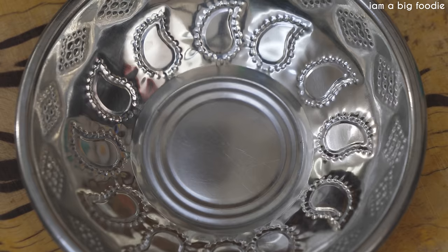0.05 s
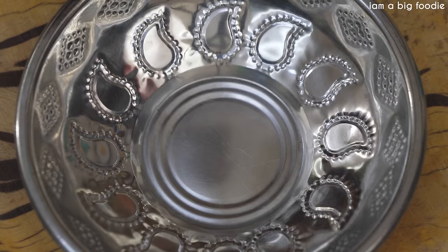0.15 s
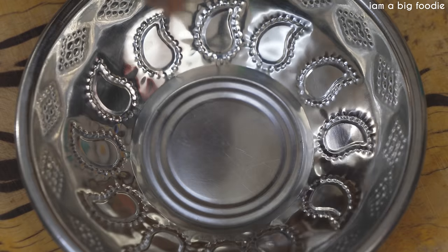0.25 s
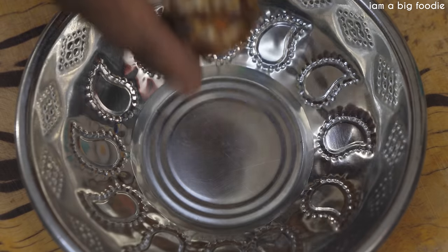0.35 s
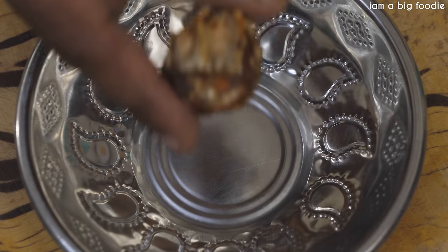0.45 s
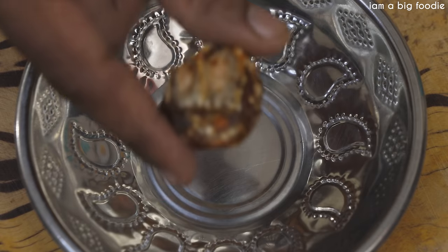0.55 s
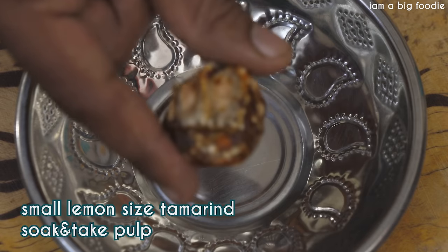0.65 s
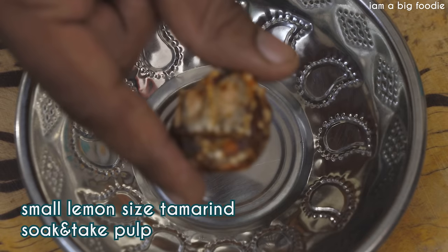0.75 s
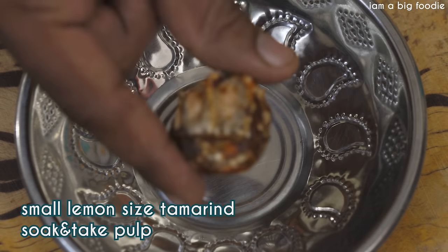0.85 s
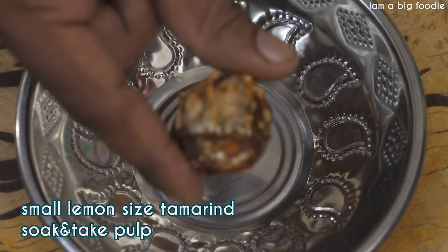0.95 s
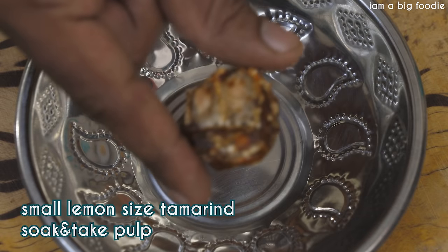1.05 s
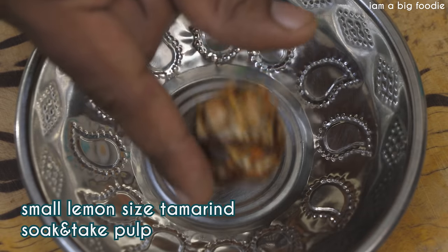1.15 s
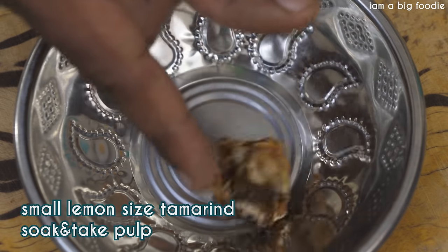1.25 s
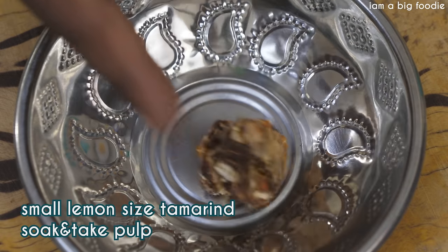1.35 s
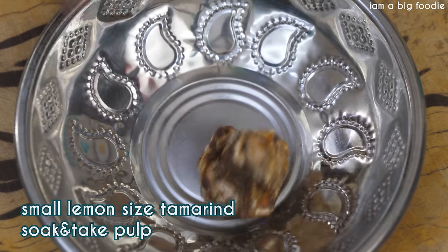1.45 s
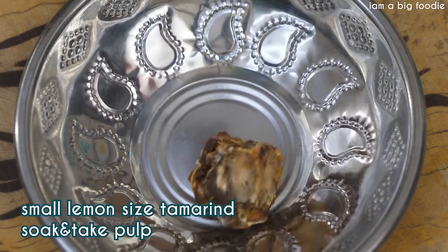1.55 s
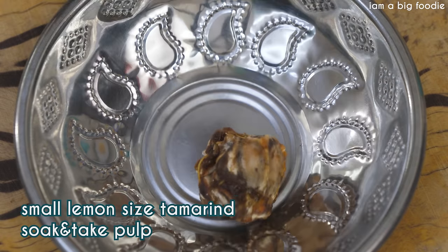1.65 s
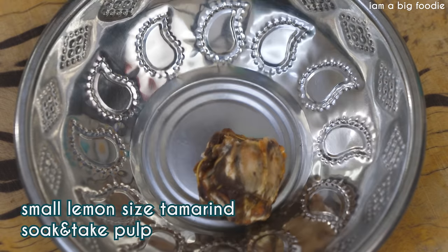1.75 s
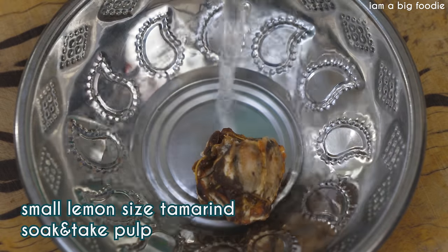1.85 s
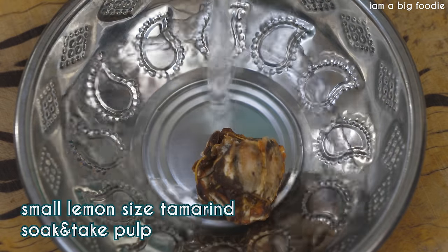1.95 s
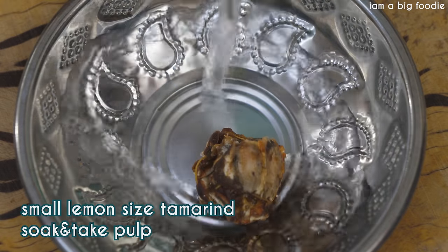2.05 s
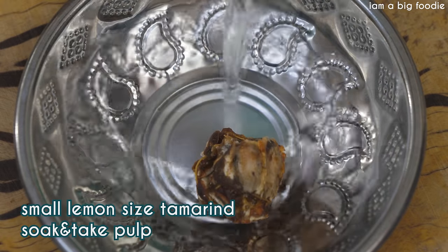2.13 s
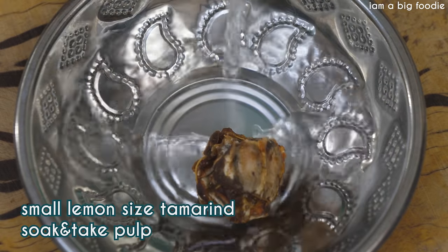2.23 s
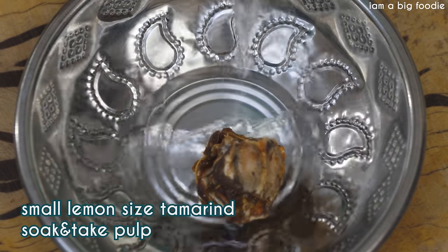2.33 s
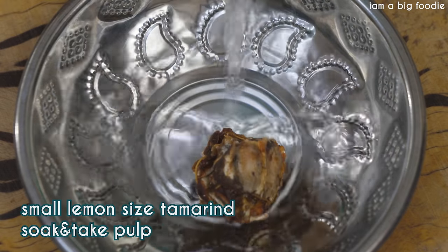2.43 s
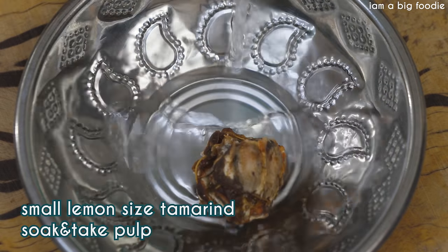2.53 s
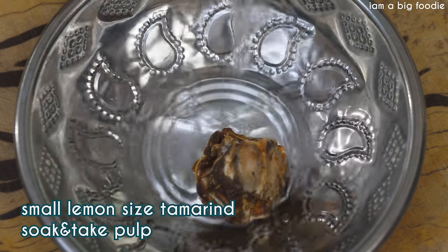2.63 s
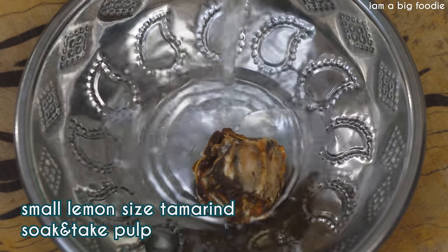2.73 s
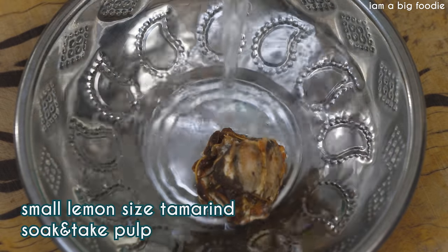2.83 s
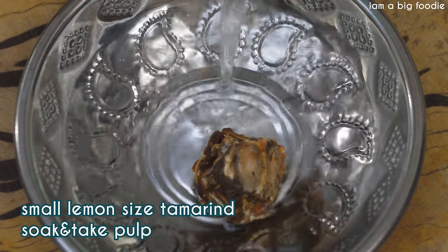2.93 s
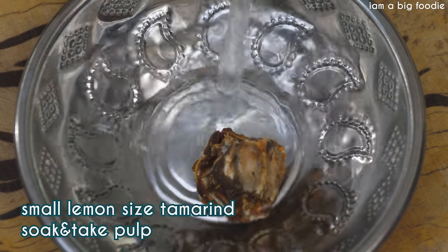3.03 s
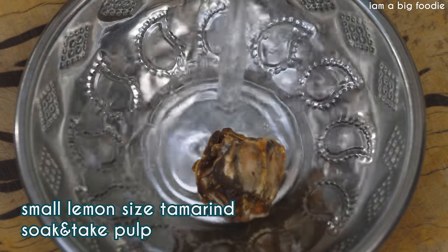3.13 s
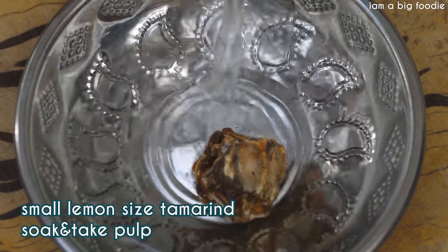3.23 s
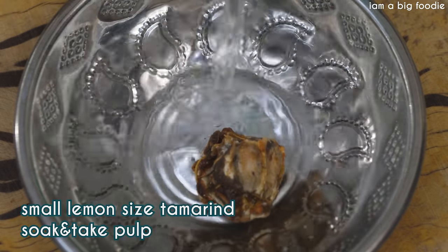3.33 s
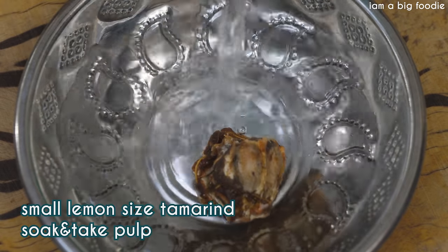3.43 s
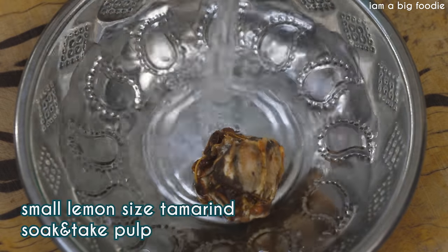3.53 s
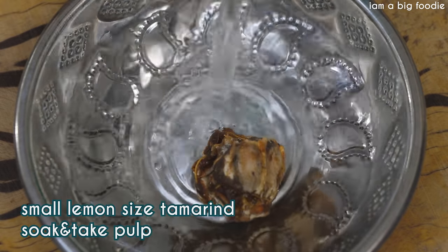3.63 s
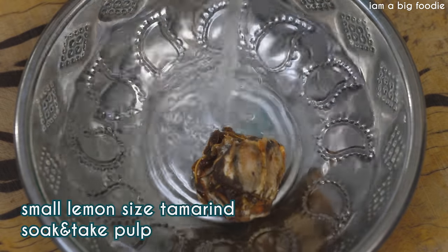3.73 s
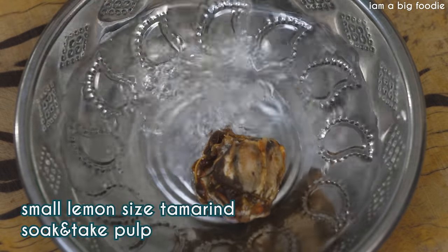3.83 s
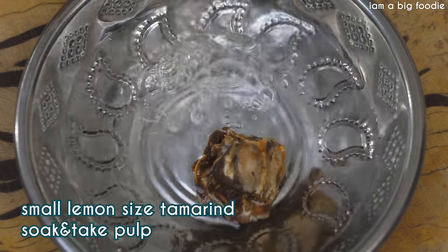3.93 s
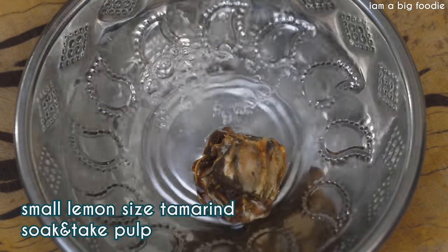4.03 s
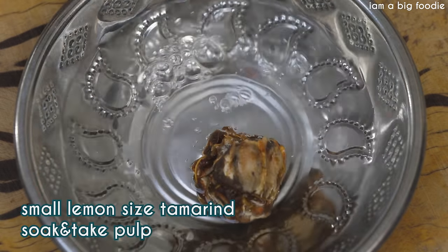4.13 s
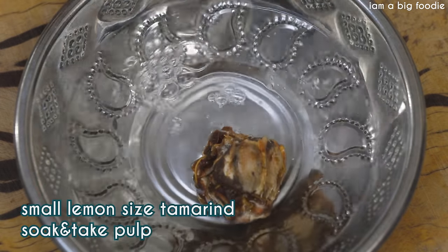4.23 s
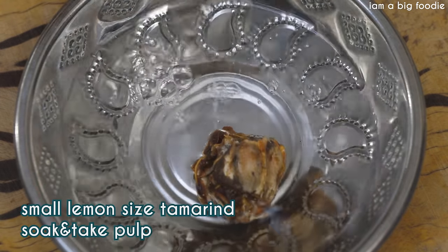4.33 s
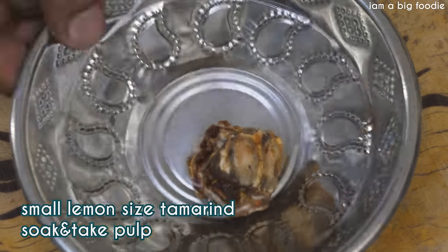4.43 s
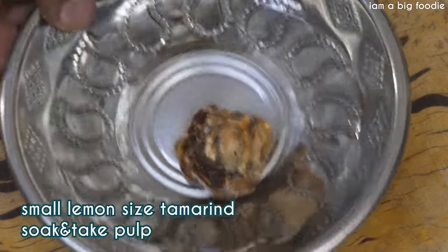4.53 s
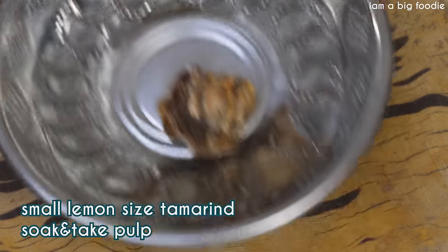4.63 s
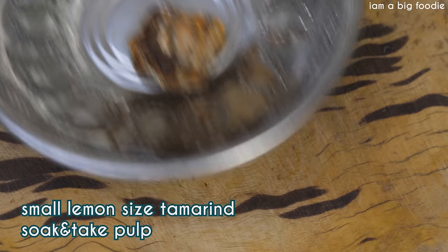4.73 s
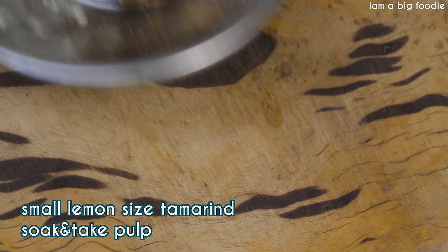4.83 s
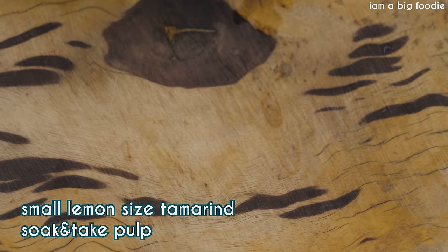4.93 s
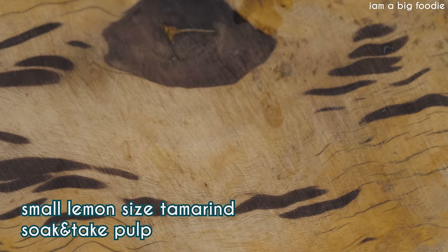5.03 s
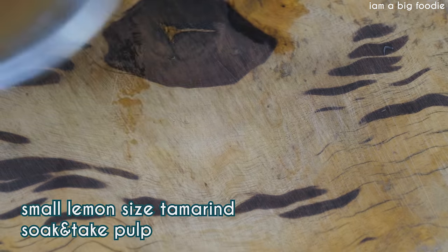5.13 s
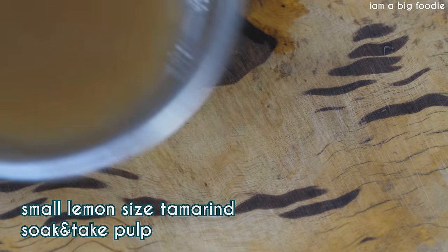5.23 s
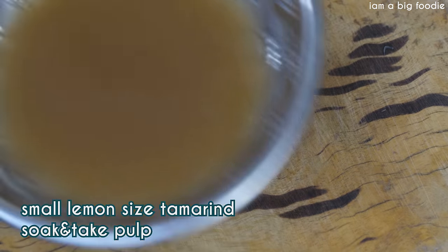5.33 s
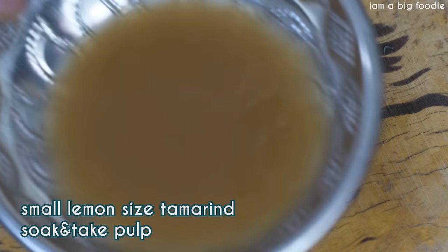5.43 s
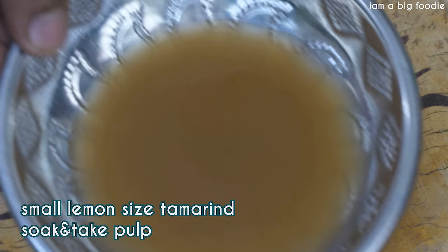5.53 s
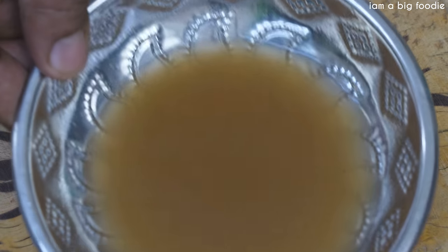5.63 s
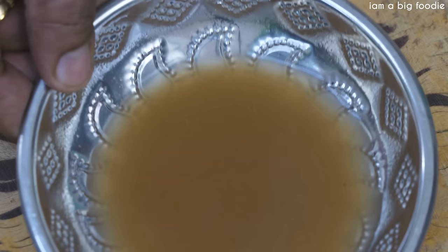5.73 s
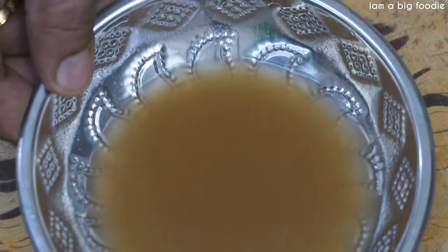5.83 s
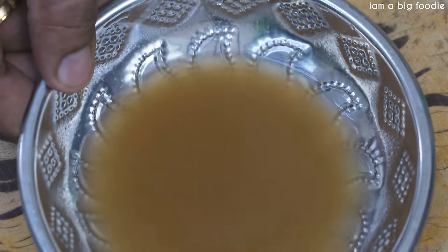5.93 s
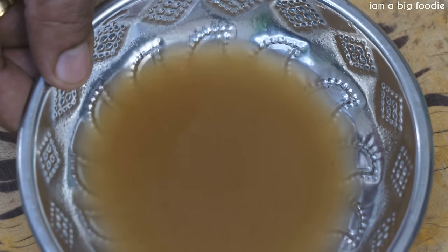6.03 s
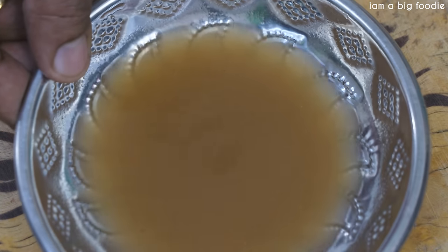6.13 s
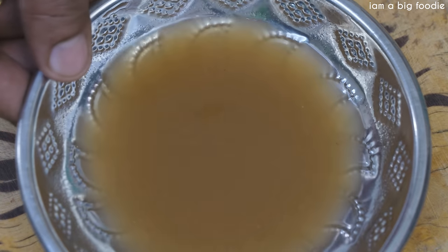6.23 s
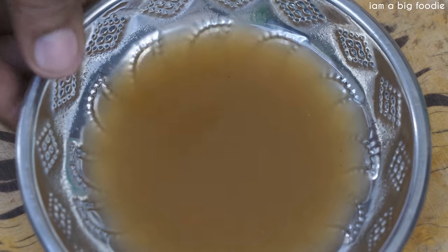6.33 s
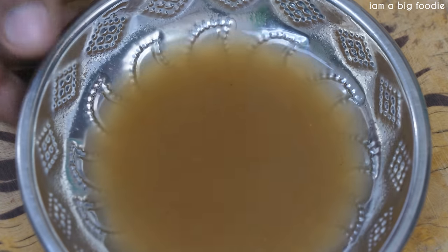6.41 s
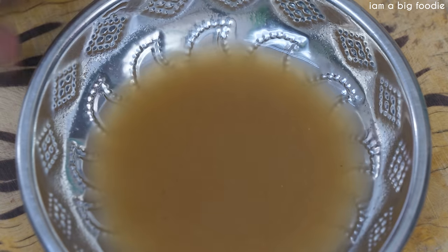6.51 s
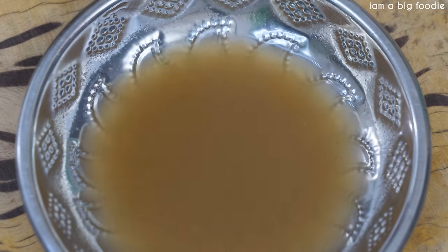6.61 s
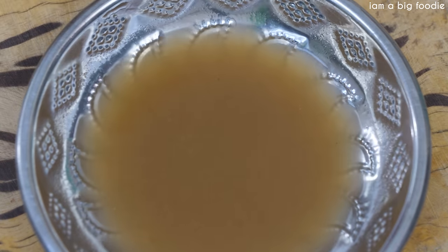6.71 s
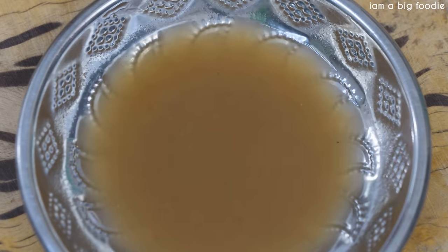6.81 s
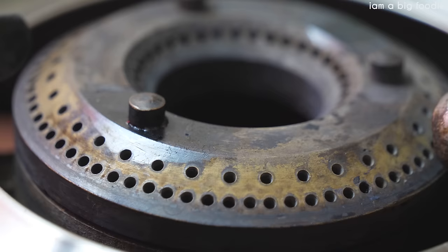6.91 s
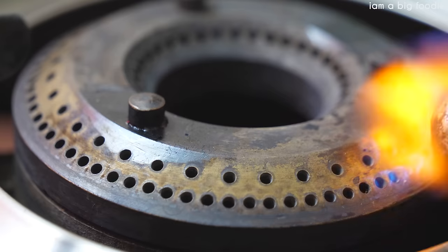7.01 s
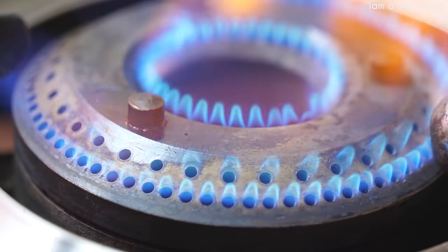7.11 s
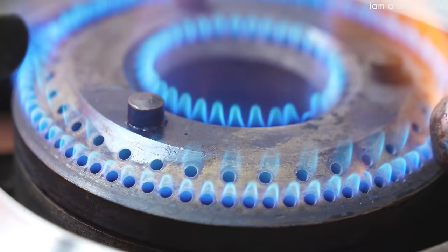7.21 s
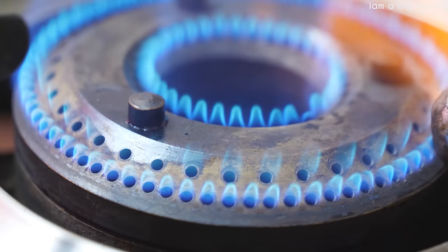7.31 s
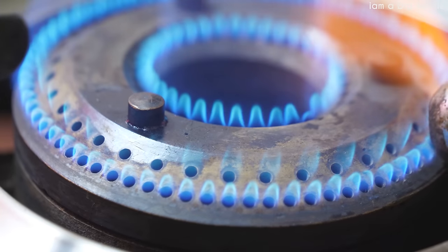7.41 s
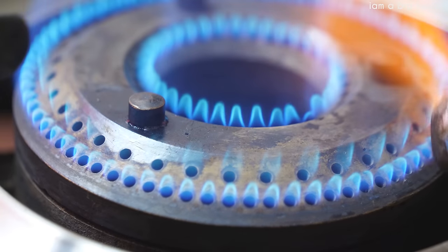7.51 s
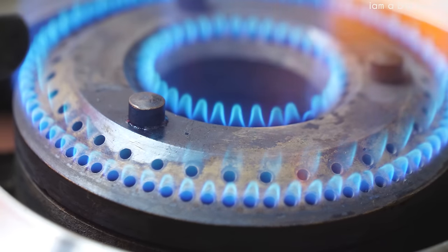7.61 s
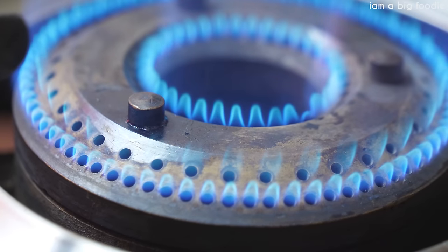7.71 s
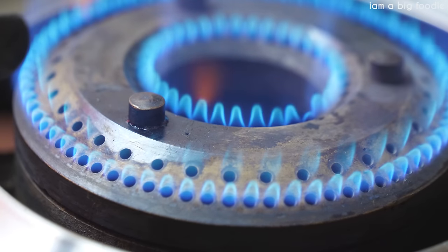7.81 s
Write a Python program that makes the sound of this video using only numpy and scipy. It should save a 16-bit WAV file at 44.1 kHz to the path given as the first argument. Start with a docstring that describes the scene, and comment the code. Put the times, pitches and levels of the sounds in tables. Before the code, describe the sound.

In a humming kitchen a sticky lump clanks into a thin steel bowl, water pours over it, the bowl clatters on wood, a gas burner ignites.

```python
"""A motor hums in a small kitchen throughout: wavering sine lines over a rush of air. One lone tick, a soft rustle,
then a sticky lump drops into a thin steel bowl: noise bursts and decaying modes. Water is poured over it:
chirping bubbles, sprays and a sheet of noise through the wet bowl's resonances, then foam ticks.
The bowl clatters onto a wooden board. A gas stove is lit: hiss, igniter snap, a low whump of flame
(sinking tone and noise); the knob springs back."""
import sys
import numpy as np
from scipy import signal
from scipy.fft import rfft, irfft
from scipy.io import wavfile

SR = 44100
rng = np.random.default_rng(int(sys.argv[2]) if len(sys.argv) > 2 else 0)


def digitize_waveform(pressure):
    """Quantize a signal to 16-bit integers and store it at the path in sys.argv[1].

    Rows of a 2-D input are taken as channels; values are limited to [-1, 1].
    """
    field = np.atleast_2d(pressure).T
    bounded = np.clip(field, -1, 1)
    quanta = np.round(bounded * 32767).astype(np.int16)
    wavfile.write(sys.argv[1], SR, quanta)


N = 346746
T = np.arange(N) / SR
RING_T = T[:SR]
TOP_HZ = 15900

# All levels are relative; the functions add their own gains.
# kitchen motor lines: pitch_hz, level_db
HUM_LINES = [(128, -66.5), (180, -60.5), (192.5, -62), (301, -68.5), (640, -77.5)]
# kitchen air spectrum: freq_hz, level_db
AIR_SPECTRUM = [(18, -78.5), (30, -50.5), (48, -22), (98, -19), (117, -15.5), (152, -10.5), (183, -7),
                (271, -12.5), (309, -10.5), (343, -12.5), (714, -16), (1270, -23.5), (1530, -23.5),
                (2380, -27), (15700, -38)]

# bubbles ringing alone: ticks, low gulps, one long whistle: start_s, level_db, pitch_hz, length_cycles
LONE_BUBBLES = [(0.128, -35.5, 4360, 36), (2.197, -47.5, 5040, 1800), (3.7745, -19.5, 3180, 30),
                (3.938, -16.5, 910, 11), (3.972, -27.5, 790, 15), (4.1237, -13, 12600, 7.4),
                (4.147, -27, 9300, 23)]

# soft rustle as the hand brings the lump in
RUSTLE_PEAK_S, RUSTLE_DB, RUSTLE_SLOPE_DB_PER_S = 0.662, -48.5, 209
# rustle spectrum: freq_hz, level_db
RUSTLE_SPECTRUM = [(300, -2), (1500, -3), (4500, -1), (9000, -7), (15700, -8.5)]

# lump meets the bowl, then rolls to rest: start_s, crash_db, ring_db
LUMP_HITS = [(1.3127, -13.5, -31.5), (1.315, -16, -33), (1.3245, -27, -57), (1.395, -48, -69),
             (1.445, -40, -45), (1.619, -49, -58), (1.726, -53.5, -79), (1.802, -59, -64)]
# empty bowl modes: pitch_hz, level_db, t60_s
EMPTY_BOWL_MODES = [(1710, -34, 0.58), (1987, -2.5, 0.28), (2084, 1.5, 0.33), (2150, -23.5, 0.83),
                    (2360, -29, 0.54), (2570, -22, 0.61), (2560, -12.5, 0.068), (2640, -41, 0.46),
                    (3090, -45.5, 0.27), (3167, -8.5, 0.47), (3540, -19.5, 0.44), (3300, -23, 0.25),
                    (3528, -6, 0.31), (3920, -31, 0.88), (4230, -20.5, 0.29), (4813, -30.5, 0.44),
                    (5071, -39, 0.41), (6360, -35.5, 0.34), (6730, -33.5, 0.307), (7752, -39.5, 0.32),
                    (8160, -12, 0.3), (9360, -41.5, 0.3), (10420, -51.5, 0.75), (11440, -21, 0.2)]
# blow on the empty bowl, spectrum: freq_hz, level_db
BOWL_BLOW_SPECTRUM = [(88, -63.5), (150, -30.5), (239, -17.5), (621, -22), (1460, -17), (2080, -4),
                      (2470, -6), (3060, -4.5), (5600, -14.5), (7800, -17.5), (8430, -27), (9660, -20.5),
                      (15700, -35.5)]
# dense after-ring of the empty bowl, spectrum: freq_hz, level_db
BOWL_RING_SPECTRUM = [(410, -42), (700, -16.5), (1010, -15.5), (1590, -9), (1910, -13), (2060, -1.5),
                      (2570, -8), (3900, 1.5), (5550, -20.5), (15700, -37)]

# flow: smooth thread, breaking up as the bowl fills, then cut off: time_s, gurgle_db, spatter_db
POUR_FLOW = [(1.85, -59, -76), (1.92, -55.5, -73.5), (2.62, -55, -56.5), (2.79, -46.5, -50),
             (3.14, -44, -45), (3.25, -48.5, -52.5), (3.33, -42, -50), (3.56, -39, -50), (3.79, -45.5, -53),
             (3.99, -40, -58), (4.05, -54, -70)]
POUR_START_S, POUR_END_S = POUR_FLOW[0][0], POUR_FLOW[-1][0]
# single drops and gulps, loud and faint, during and just after the pour:
# start_s, level_db, bubble_pitch_hz, spray_db
DROPS = [(1.905, -33, 3530, -48), (1.923, -38, 3640, -43.5), (2.1405, -34.5, 3400, -49.5),
         (2.177, -31, 3440, -41.5), (2.3024, -37, 3220, -37), (2.3111, -32, 3560, -32.5),
         (2.3326, -22.5, 3430, -30.5), (2.4349, -25, 2050, -40), (2.4793, -27.5, 3050, -42.5),
         (2.5282, -30, 3480, -34), (2.6234, -22, 3560, -68), (2.7227, -34, 3550, -32.5),
         (2.7676, -24, 2070, -55), (2.8275, -15.5, 3230, -58), (2.8963, -29, 2200, -31.5),
         (3.0185, -26, 3500, -38.5), (3.1263, -22, 1780, -49), (3.1464, -24, 2040, -36.5),
         (3.4111, -23.5, 3750, -58), (3.4316, -18, 2390, -62), (3.46, -17, 3780, -59),
         (3.4724, -19, 2430, -58), (3.7014, -22, 2330, -49), (3.8097, -20.5, 2420, -30),
         (3.8397, -17, 1710, -31.5), (3.8756, -15.5, 3020, -44), (3.896, -19, 3500, -24),
         (3.911, -11.5, 3200, -29.5), (3.9709, -21, 1720, -33.5), (3.9993, -25.5, 2050, -42),
         (4.4314, -44, 1640, -59), (4.4982, -27.5, 2120, -55)]
# slap of a drop on steel, spectrum: freq_hz, level_db
SLAP_SPECTRUM = [(700, -10), (1300, 8.5), (2100, 16), (3600, 14), (4800, -7.5), (7300, -21), (15000, -73)]
# running sheet of water, spectrum: freq_hz, level_db
SHEET_SPECTRUM = [(700, -52), (1200, -1.0), (1500, 0.5), (2150, 4), (2800, -2.5), (3600, 6),
                  (4800, -4.0), (12000, -34)]
# swilling water, spectrum: freq_hz, level_db
SWILL_SPECTRUM = [(60, -27), (200, -9.5), (380, 0.5), (850, -4.0), (1500, -9.5), (4200, -8),
                  (6000, -34), (15000, -23)]
# wet bowl resonances: centre_hz, width_hz, level_db
WET_BOWL_RESONANCES = [(1470, 60, -5), (2160, 1200, 4.5), (3870, 710, 6.5), (6650, 650, 4.5)]
SPRAY_HZ, MIST_HZ, MIST_DB = 6670, 11900, -4.5  # every drop throws a coarse spray and a finer, weaker mist
# further random drops once the stream breaks up; level follows the flow
DRIP_START_S, DRIP_END_S, DRIP_HZ, DRIP_OCTAVES = 2, 3.8, 2530, 1.14
DRIP_OVER_GURGLE_DB, DRIP_OVER_SPATTER_DB, DRIP_RANGE_DB = 15, -1, 8
# water swills round the bowl as the pour ends
SWILL_PEAK_S, SWILL_DB, SWILL_RISE_DB_PER_S, SWILL_FALL_DB_PER_S = 3.88, -55, 69, 14.5
# foam bursts
FOAM_START_S, FOAM_LENGTH_S, FOAM_HZ, FOAM_OCTAVES = 4.03, .5, 8700, 1.4
FOAM_DB, FOAM_RANGE_DB, FOAM_FADE_DB_PER_S = -37, 18, 12

# filled bowl meets the board: start_s, knock_db, wall_ring_db, rim_scrape_db
BOARD_HITS = [(5.8622, -20.5, -22.5, -59), (5.874, -42, -18.5, -64), (5.938, -21, -26, -45),
              (5.96, -51, -24, -67), (6.107, -33, -33.5, -27.5), (6.189, -42.5, -69, -47),
              (6.306, -58, -46, -73), (6.365, -56, -63, -76)]
# filled bowl wall modes: pitch_hz, level_db, t60_s
FULL_BOWL_MODES = [(684, -19.5, 0.31), (1122, -2, 0.091), (1165, 2, 0.1), (1264, -2.5, 0.15),
                   (1386, 4.5, 0.086), (1910, -7, 0.16), (1980, -21, 0.28), (2330, -0.5, 0.061),
                   (2394, -26, 0.13), (2520, -8.5, 0.16), (2540, -32, 0.19), (3360, -15, 0.19),
                   (3820, -12, 0.13), (4330, -21, 0.37)]
# knock of the filled bowl's base, spectrum: freq_hz, level_db
FULL_BLOW_SPECTRUM = [(150, -61), (250, -27), (406, -11.5), (458, -15.5), (660, -9.5), (732, -16),
                      (1250, 1), (1540, -6), (2000, -1.5), (2550, -2), (2980, -15.5), (4210, -12),
                      (5850, -28.5), (7590, -25), (15700, -70)]
# bowl rim, spectrum: freq_hz, level_db
RIM_SPECTRUM = [(590, -31), (1000, -31), (1380, -26), (1500, -26), (2070, 3), (2320, -36), (2570, 2.5),
                (2990, -16), (3850, -9), (10900, -19), (15700, -27)]

GAS_ON_S, GAS_OPENING_S, GAS_DB = 6.96, 0.028, -43  # valve opens on a steady hiss
# gas hiss spectrum: freq_hz, level_db
GAS_SPECTRUM = [(35, -29), (60, -18), (156, 4.5), (336, -27), (835, -18.5), (1010, -19), (2070, -24.5),
                (2500, -26), (6960, -32.5), (10800, -31), (15700, -36.5)]
# gas catches in quick flares: peak_s, level_db
FLARE_PEAKS = [(7.137, -11), (7.22, -15), (7.295, -15.5)]
FLARE_RISE_DB_PER_S, FLARE_FALL_DB_PER_S = 600, 290
WHUMP_START_HZ, WHUMP_END_HZ, WHUMP_SAG_S = 171.7, 105.3, 0.0592  # pitch sinks as the flame spreads
# noise part of the whump, spectrum: freq_hz, level_db
WHUMP_SPECTRUM = [(40, -54.0), (85, -7), (190, 3), (320, -13.0), (1500, -62)]
# flame roars up once, then settles to a steady flutter
ROAR_PEAK_S, ROAR_DB, ROAR_RISE_DB_PER_S, ROAR_FALL_DB_PER_S, FLAME_DB = 7.32, -25, 160, 134, -45
# flame spectrum: freq_hz, level_db
FLAME_SPECTRUM = [(35, -63), (60, -19), (155, 1.5), (255, -18), (407, -9.5), (526, -7.5), (710, -11.5),
                  (946, -16.5), (2200, -26), (2860, -57), (4840, -120)]

# igniter hammer trips, strikes, bounces: start_s, level_db
IGNITER_HITS = [(7.1158, -9), (7.1172, 4), (7.126, -8)]
# igniter snap spectrum: freq_hz, level_db
SNAP_SPECTRUM = [(47, -24), (80, -12), (177, -7), (667, -11.5), (814, -5.5), (1160, -10.5), (2200, -12),
                 (2680, -16), (3820, -1.5), (4360, -3), (5820, -15.5), (7750, -7.5), (10100, -15.5),
                 (13800, -14), (15700, -30)]
# sheet-metal stove body, ring spectrum: freq_hz, level_db
STOVE_RING_SPECTRUM = [(150, -30), (250, -11), (308, -7.5), (574, -2.5), (1090, -8.5), (1340, -11),
                       (2420, -15), (3930, 0.5), (5460, -15.5), (8870, -15), (9850, -19), (14900, -31),
                       (15700, -26)]
# knob knocks in the stove's front: start_s, thud_db, click_db, spring_ring_db
KNOB_HITS = [(7.08, -38, -75, -69), (7.3552, -27, -21.5, -60), (7.413, -25, -53, -57),
             (7.58, -33, -52, -61), (7.592, -31, -45, -65), (7.6299, -15.5, -18, -13)]
# knob thud spectrum: freq_hz, level_db
KNOB_THUD_SPECTRUM = [(88, -34), (150, -16), (364, -0.5), (757, 3), (1020, -5), (1250, -11.5), (1520, -5.5),
                      (1700, -14.5), (1990, -12.5), (2200, -20), (2860, -33), (4840, -120)]
# knob click spectrum: freq_hz, level_db
KNOB_CLICK_SPECTRUM = [(1290, -50), (2200, -12), (2330, -13), (2770, -11), (3400, -8.5), (3910, -8),
                       (4540, -11), (5130, -17), (5910, -19.5), (7080, -26), (7750, -19.5), (10300, -23),
                       (15700, -44)]
# knob spring modes, before a shared extra decay: pitch_hz, level_db, t60_s
KNOB_SPRING_MODES = [(432, -33, 0.21), (692, -5, 0.84), (2517, -6.5, 0.63), (2770, -12, 0.54),
                     (2806, 1, 0.47), (3980, -3.5, 0.56), (3830, 3.5, 0.25), (5140, 0.5, 0.15),
                     (7180, -3.5, 0.22), (9286, -22, .4)]


def undb(db):
    """Decibels to gain."""
    return 10 ** (np.asarray(db) / 20)


def unit(x):
    """Scale to rms 1."""
    return x / np.sqrt(np.mean(x ** 2) + 1e-20)


def curves(rows):
    """Each column of a table, joined by straight lines in time."""
    time_s, *columns = np.transpose(rows)
    return [np.interp(T, time_s, column) for column in columns]


def add(out, start_s, x):
    """Mix x into out from start_s."""
    i = int(np.clip(start_s * SR, 0, N - 1))
    out[i:i + len(x)] += x[:N - i]


def fade(t60, t=RING_T):
    """Exponential decay of 60 dB in t60."""
    return np.exp(-np.log(1000) * t / max(t60, 1e-4))


def swell(peak_s, rise_db_per_s, fall_db_per_s):
    """A gain that climbs to 1 at peak_s and dies away, both at a steady rate in dB."""
    return undb(-np.maximum(rise_db_per_s * (peak_s - T), fall_db_per_s * (T - peak_s)))


def walk(rate_hz):
    """Random wander: normal points at rate_hz, joined by lines."""
    points = rng.standard_normal(2048)
    return np.interp(T * rate_hz, np.arange(len(points)), points)


def colour(x, spectrum):
    """Pass x through a causal minimum-phase filter shaped by (freq_hz, level_db) points; rms 1."""
    hz, db = np.transpose(spectrum)
    size = 4096
    f = np.maximum(np.fft.rfftfreq(size, 1 / SR), 1)
    gain = undb(np.interp(np.log(f), np.log(hz), db))
    cepstrum = irfft(np.log(gain))
    # keeping one side of the cepstrum makes the response causal
    response = irfft(np.exp(rfft(2 * cepstrum[:size // 2], size)))
    return unit(signal.fftconvolve(x, response)[:len(x)])


def noise(spectrum, size=SR):
    """Coloured noise at rms 1."""
    return colour(rng.standard_normal(size), spectrum)


def burst(spectrum, t60, size=SR):
    """A crowd of modes too dense to tell apart: decaying noise that starts at rms near 1."""
    envelope = fade(t60, RING_T[:size])
    crowd = colour(rng.standard_normal(size) * envelope, spectrum)
    return crowd * np.sqrt(np.mean(envelope ** 2))


def ring(modes):
    """Struck modes, each a decaying sine at its own phase; 1 ms onset, rms near 1 at the start."""
    waves = np.zeros(SR)
    for hz, db, t60 in modes:
        waves += undb(db) * fade(t60) * np.sin(2 * np.pi * (hz * RING_T + rng.random()))
    contact = np.minimum(RING_T / .001, 1)
    return contact * waves / np.sqrt(sum(undb(db) ** 2 for _, db, _ in modes) / 2)


def echo(x, response):
    """Pass x through a response of unit energy."""
    return signal.fftconvolve(x, response / np.linalg.norm(response))[:N]


def bubble(hz, cycles, glide):
    """A pocket of air rings for some cycles, rising in pitch as it nears the surface."""
    age = np.arange(int(cycles * SR / hz) + 2) / SR * hz / cycles  # 0 to 1 over its life
    onset = 1 - np.exp(-age * cycles)
    return onset * fade(0.85, age) * np.sin(2 * np.pi * cycles * (age + glide * age ** 2 / 2))


def spray(hz, t60, octaves, size=4096):
    """A puff of droplets of like size: a brief hiss around one pitch."""
    t = RING_T[:size]
    f = np.maximum(np.fft.rfftfreq(size, 1 / SR), 1)
    band_gain = 1 / (1 + (np.log2(f / hz) / octaves) ** 2)
    band = irfft(rfft(rng.standard_normal(size)) * band_gain)
    onset = 1 - np.exp(-t / 0.0013)
    return unit(band) * onset * fade(t60, t)


def kitchen():
    """A motor's wavering sine lines over a soft rush of air."""
    hum = np.zeros(N)
    for hz, db in HUM_LINES:
        level = undb(db + 1.6 * walk(6))
        phase = 2 * np.pi * np.cumsum(hz + 1.8 * walk(12)) / SR
        hum += level * np.sqrt(2) * np.sin(phase)
    draught = undb(.6 * walk(3))
    air = undb(-57.0) * draught * noise(AIR_SPECTRUM, size=N)
    return (hum + air) * np.clip((T - .04) / 0.015, 0, 1)


def ticks():
    """Lone bubbles: most are ticks some tens of cycles long or less."""
    out = np.zeros(N)
    for start_s, db, hz, cycles in LONE_BUBBLES:
        add(out, start_s, undb(db) * bubble(hz, cycles, glide=0.0092))
    return out


def rustle():
    """A brief, soft brush of noise before the lump drops."""
    level = undb(RUSTLE_DB) * swell(RUSTLE_PEAK_S, RUSTLE_SLOPE_DB_PER_S, RUSTLE_SLOPE_DB_PER_S)
    return level * noise(RUSTLE_SPECTRUM, size=N)


def lump():
    """The lump strikes the dry bowl: a short crash, then dense and single modes ring on."""
    out = np.zeros(N)
    walls = ring(EMPTY_BOWL_MODES)
    for start_s, crash_db, ring_db in LUMP_HITS:
        add(out, start_s, undb(crash_db) * burst(BOWL_BLOW_SPECTRUM, t60=0.1))
        after_ring = burst(BOWL_RING_SPECTRUM, t60=0.51) + undb(-2.5) * walls
        add(out, start_s, undb(ring_db) * after_ring)
    return out


def swarm(hz, spread, scatter_db, cycles, count):
    """Bubbles of random size at random moments of the pour; rms 1 while it lasts."""
    out = np.zeros(N)
    starts_s = rng.uniform(POUR_START_S, POUR_END_S, count)
    draws = np.clip(rng.standard_normal((count, 2)), -2.3, 2.3)
    for start_s, (pitch, size) in zip(starts_s, draws):
        bubble_hz = min(hz * np.exp(spread * pitch), TOP_HZ)
        add(out, start_s, undb(scatter_db * size) * bubble(bubble_hz, cycles, glide=0.076))
    return unit(out) * np.sqrt((POUR_END_S - POUR_START_S) * SR / N)


def stream():
    """Beneath the single drops, gurgling bubbles, a sheet of water, fizz and mist follow the flow; then swill."""
    gurgle_db, spatter_db = curves(POUR_FLOW)
    bubbles = swarm(hz=2713, spread=0.337, scatter_db=4.5, cycles=30, count=1700)
    # the wet bowl carries little of the gurgle below about 1.4 kHz
    gurgle = signal.sosfilt(signal.butter(4, 1450, "high", fs=SR, output="sos"), bubbles)
    sheet = undb(5.9 * walk(70)) * noise(SHEET_SPECTRUM, size=N)
    sheet *= (T > POUR_START_S) & (T < POUR_END_S)
    fizz = swarm(hz=9100, spread=0.343, scatter_db=1, cycles=45, count=1000)
    mist = np.zeros(N)
    for when, height, size in rng.random((260, 3)):
        start_s = POUR_START_S + when * (POUR_END_S - POUR_START_S)
        add(mist, start_s, undb(24 * size) * spray(5000 * 3 ** height, t60=0.032, octaves=0.099))
    slosh = swell(SWILL_PEAK_S, SWILL_RISE_DB_PER_S, SWILL_FALL_DB_PER_S)
    swill = slosh * undb(SWILL_DB + 2 * walk(35)) * noise(SWILL_SPECTRUM, size=N)
    low = undb(gurgle_db - 3) * (gurgle + sheet / 2)
    high = undb(spatter_db - 5.0) * (fizz + unit(mist))
    return low + high + swill


def drips(count):
    """Further random drops at loosely even moments, levels following the flow: rows like those of DROPS."""
    when, size, pitch, wetness = rng.random((count, 4)).T
    start_s = DRIP_START_S + (DRIP_END_S - DRIP_START_S) * (np.arange(count) + when) / count
    gurgle_db, spatter_db = (np.interp(start_s, T, curve) for curve in curves(POUR_FLOW))
    db = gurgle_db + DRIP_OVER_GURGLE_DB + DRIP_RANGE_DB * (size - .5)
    spray_db = spatter_db + DRIP_OVER_SPATTER_DB + DRIP_RANGE_DB * (wetness - .5)
    hz = DRIP_HZ * 2 ** (DRIP_OCTAVES * (pitch - .5))
    return list(zip(start_s, db, hz, spray_db))


def splashes():
    """Each drop slaps the steel, traps a few bubbles of like size and throws a fine spray."""
    out = np.zeros(N)
    for start_s, db, hz, spray_db in list(DROPS) + drips(count=24):
        add(out, start_s, undb(db - 9.5) * burst(SLAP_SPECTRUM, t60=0.021, size=4096))
        add(out, start_s + 0.00046, undb(db + 2) * bubble(hz, cycles=32.0, glide=0.15))
        # weaker pockets pinch off within the next 13 ms
        for late, detune in rng.random((3, 2)):
            pocket = bubble(hz * 1.67 ** (detune - .5), cycles=21.6, glide=0.049)
            add(out, start_s + 0.013 * late, undb(db - 4.5) * pocket)
        fineness = 1.43 ** (rng.random() - .5)
        coarse = spray(SPRAY_HZ * fineness, t60=.045, octaves=.3)
        fine = spray(MIST_HZ * fineness, t60=.045, octaves=.3)
        add(out, start_s, undb(spray_db + 2) * (coarse + undb(MIST_DB) * fine))
    return out


def foam(count):
    """Tiny bubbles burst on the settling water, fainter on average with time."""
    out = np.zeros(N)
    for when, size, pitch in rng.random((count, 3)):
        age_s = when * FOAM_LENGTH_S
        db = FOAM_DB - FOAM_FADE_DB_PER_S * age_s + FOAM_RANGE_DB * (size - .5)
        hz = FOAM_HZ * 2 ** (FOAM_OCTAVES * (pitch - .5))
        add(out, FOAM_START_S + age_s, undb(db) * bubble(hz, cycles=15.2, glide=.03))
    return out


def water():
    """The water sounds directly and through the broad resonances of the wet bowl."""
    wet = splashes() + stream() + foam(count=170)
    f = np.fft.rfftfreq(SR, 1 / SR)
    shape = sum(undb(db) / (1 + (2 * (f - hz) / width_hz) ** 2) for hz, width_hz, db in WET_BOWL_RESONANCES)
    hollow = irfft(rfft(rng.standard_normal(SR)) * shape) * fade(0.075)
    return wet + undb(-9.5) * echo(wet, hollow)


def clatter():
    """The filled bowl rocks onto the board: contact tick, dull base knocks, ringing walls, bright rim."""
    out = np.zeros(N)
    walls = ring(FULL_BOWL_MODES)
    for start_s, knock_db, wall_db, rim_db in BOARD_HITS:
        tick = undb(-13) * burst(RIM_SPECTRUM, t60=0.039)
        base = burst(FULL_BLOW_SPECTRUM, t60=.12) + undb(-20) * burst(FULL_BLOW_SPECTRUM, t60=0.63)
        rim = burst(RIM_SPECTRUM, t60=0.13) + undb(-8) * burst(RIM_SPECTRUM, t60=0.3)
        add(out, start_s, undb(knock_db) * (tick + base) + undb(wall_db) * walls + undb(rim_db) * rim)
    return out


def burner():
    """Gas hisses from the ports, catches with a low throbbing whump and burns on with a flutter."""
    hiss = undb(GAS_DB) * noise(GAS_SPECTRUM, size=N)
    hiss *= np.clip((T - GAS_ON_S) / GAS_OPENING_S, 0, 1)
    burning_s = np.maximum(T - IGNITER_HITS[0][0], 0)
    hz = WHUMP_END_HZ + (WHUMP_START_HZ - WHUMP_END_HZ) * np.exp(-burning_s / WHUMP_SAG_S)
    phase = 2 * np.pi * np.cumsum(hz * (1 + 0.093 * walk(90))) / SR
    whump = np.sqrt(2) * np.sin(phase) + undb(-7.0) * noise(WHUMP_SPECTRUM, size=N)
    flares = np.zeros(N)
    for peak_s, db in FLARE_PEAKS:
        flares += undb(db - 2.0) * swell(peak_s, FLARE_RISE_DB_PER_S, FLARE_FALL_DB_PER_S)
    roar = undb(ROAR_DB) * swell(ROAR_PEAK_S, ROAR_RISE_DB_PER_S, ROAR_FALL_DB_PER_S)
    flutter = (undb(FLAME_DB) + roar) * undb(2 * walk(25)) * noise(FLAME_SPECTRUM, size=N)
    return hiss + (burning_s > 0) * (flutter + flares * whump)


def stove():
    """The igniter's hammer crashes through the sheet-metal body; the knob knocks, clicks, rings its spring."""
    out = np.zeros(N)
    for start_s, db in IGNITER_HITS:
        snap = burst(SNAP_SPECTRUM, t60=0.096)
        body = undb(-14.5) * burst(STOVE_RING_SPECTRUM, t60=0.57)
        add(out, start_s, undb(db) * (snap + body))
    for start_s, thud_db, click_db, spring_db in KNOB_HITS:
        thud = burst(KNOB_THUD_SPECTRUM, t60=0.11) + undb(-7.0) * burst(KNOB_THUD_SPECTRUM, t60=0.16)
        add(out, start_s, undb(thud_db) * thud)
        add(out, start_s, undb(click_db) * burst(KNOB_CLICK_SPECTRUM, t60=0.065))
        # quick drop, then a weaker long ring
        spring = ring(KNOB_SPRING_MODES) * (fade(.13) + undb(-8)) / 2
        add(out, start_s, undb(spring_db) * spring)
    return out


def scene():
    """All sources; the near ones, but not burner and kitchen, get a short echo of hard kitchen walls."""
    near = ticks() + rustle() + lump() + water() + clatter() + stove()
    walls = noise([(100, 11.5), (1000, 2.0), (4000, -3.5), (9000, -7), (16000, -1.0)])  # freq_hz, level_db
    walls *= fade(0.425) * (RING_T > .006)
    return (near + undb(-11.5) * echo(near, walls) + burner() + kitchen())[None]


def record(dry):
    """Overload clips the recorder at full scale; a steep low-pass cuts the top."""
    low_pass = signal.ellip(10, .2, 70, TOP_HZ, fs=SR, output="sos")
    return signal.sosfilt(low_pass, np.clip(dry, -1, 1))


dry = scene()
out = record(dry)
digitize_waveform(out)
```